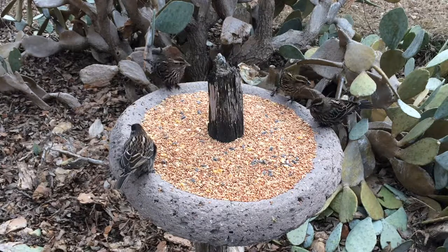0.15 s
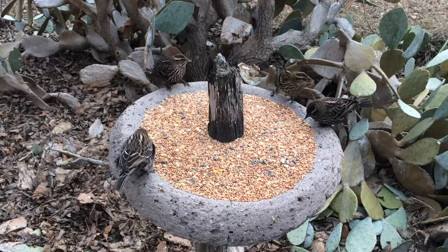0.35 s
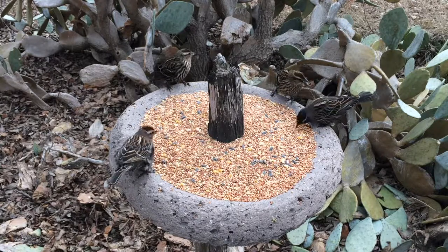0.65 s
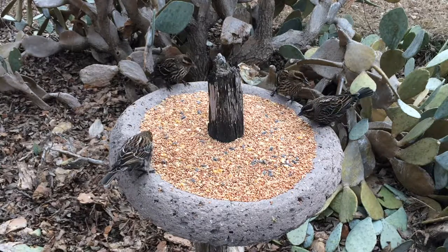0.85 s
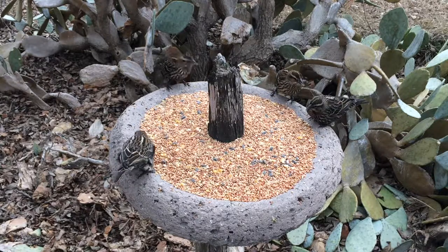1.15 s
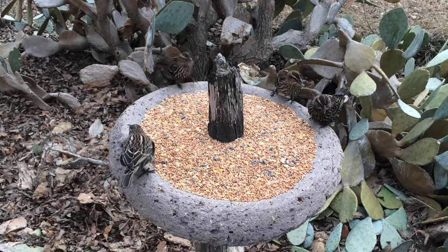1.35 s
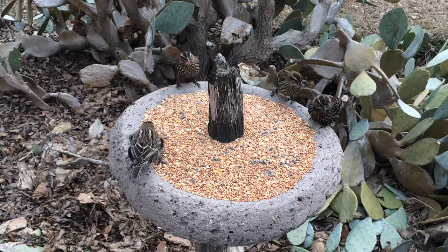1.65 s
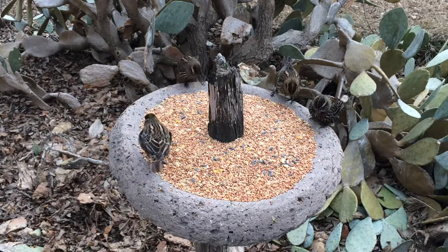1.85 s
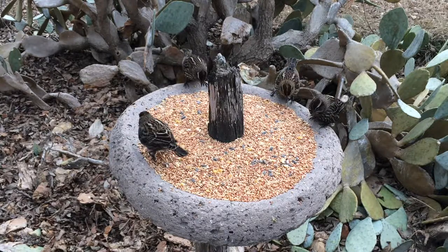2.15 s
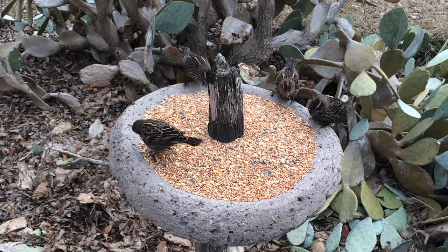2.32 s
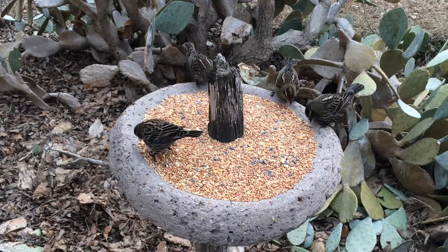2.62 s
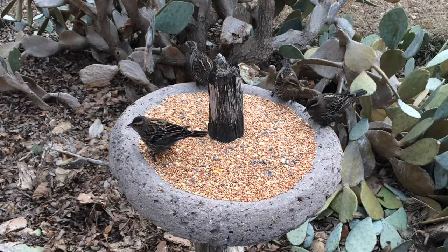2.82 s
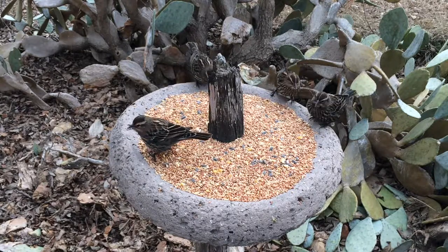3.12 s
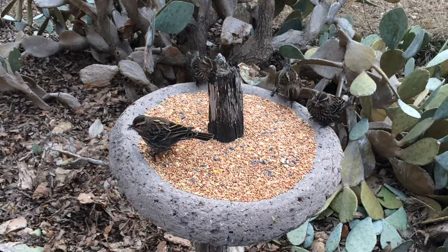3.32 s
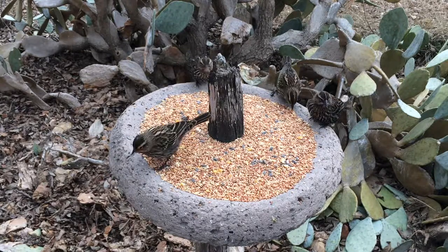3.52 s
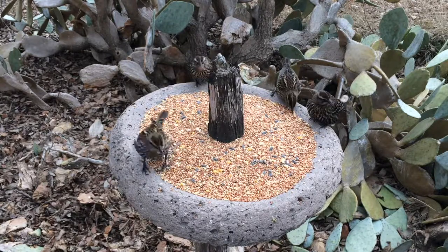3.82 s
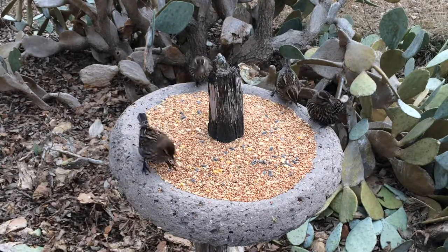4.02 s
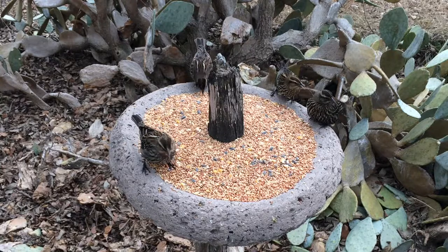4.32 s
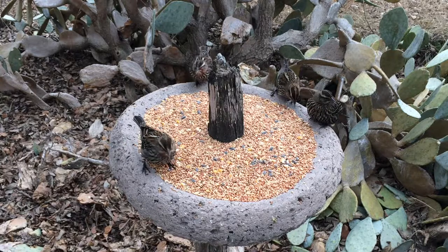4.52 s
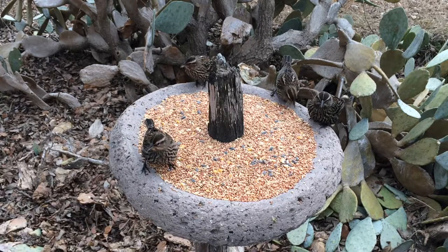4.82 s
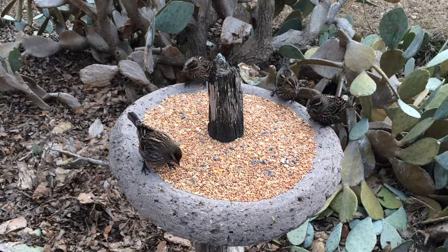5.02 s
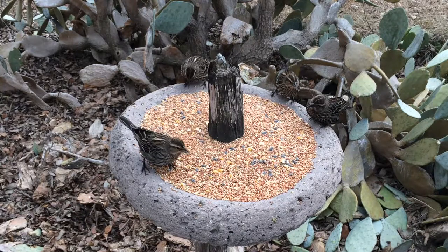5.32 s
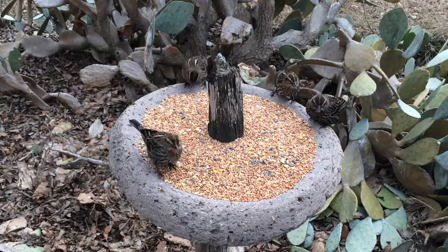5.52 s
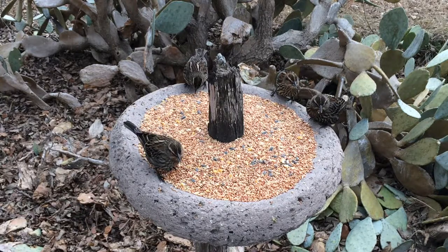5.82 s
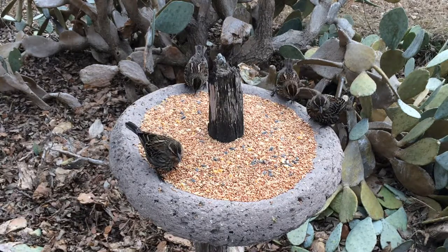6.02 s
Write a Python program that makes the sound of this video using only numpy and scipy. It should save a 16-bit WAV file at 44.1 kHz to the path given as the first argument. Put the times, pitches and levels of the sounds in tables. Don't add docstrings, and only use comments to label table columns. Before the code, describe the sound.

A quiet outdoor garden with faint far traffic hum and hiss. From 0 to 1.3 s, soft low wind puffs bump the microphone while a small cluster of dry beak ticks sounds near 0.45 s and fainter ones near 0.7. Around 1.5-1.9 s come firmer clicks, a tiny hoarse chuck, a faint distant rising bird note and a short chirp. A very hard bright crack lands at 2.5 s. Light taps follow near 3.1, then a crisp husk crunch at 3.3 and scattered ticks of tumbling seed. From 4.17 to 4.7 s blows crowd into a rapid crackling flurry, with a clear rising chirp at 4.4 and a loud snap at 4.5. Wind thumps return at 4.6-5.3, with a rough chuck at 4.9. Sparse ticks, soft chirps near 5.7 and faint far notes close it, seed rustling finely underneath.

```python
import sys
import numpy as np
from scipy import signal
from scipy.fft import rfft, irfft
from scipy.io import wavfile
from scipy.ndimage import uniform_filter1d

SR = 44100
rng = np.random.default_rng(int(sys.argv[2]) if len(sys.argv) > 2 else 0)


def put_to_file(sound):
    columns = np.atleast_2d(sound).T
    safe = np.clip(columns, -1, 1)
    whole_steps = np.round(safe * 32767)
    wavfile.write(sys.argv[1], SR, whole_steps.astype(np.int16))


def ratio(d):
    e = np.asarray(d, float) / 20
    return 10 ** e


N = 271297

# (frequency [Hz], density [dB per Hz])
GARDEN_SPECTRUM = [(15, -7), (25, -5.5), (64, -6), (133, -1.5), (260, -7.5), (1060, -15), (3850, -31),
                   (14400, -42), (15600, -37)]
# (time [s], level [dB])
BREEZE_CURVE = [(0.0, -53), (0.67, -45), (1.16, -51), (1.37, -56), (1.49, -62.5), (1.87, -54.5), (2.3, -63),
                (2.69, -54), (3.99, -60), (4.15, -62), (4.5, -53), (4.88, -51.5), (5.89, -59),
                (6.15, -56.5)]
# (frequency [Hz], density [dB per Hz])
BREEZE_SPECTRUM = [(13, -54), (22, -18), (54, 4), (108, -2), (195, -12.5), (260, -32.5), (351, -28.5),
                   (445, -33.5), (500, -47.5), (650, -41), (1100, -120)]
# (time [s], peak level [dB], swing rate [Hz])
EDDIES = [(0.01, -30, 82), (0.147, -45, 76), (0.46, -26, 94), (0.529, -30.5, 105), (0.666, -28.5, 80),
          (0.788, -26, 67.7), (0.974, -21.5, 90.6), (1.072, -31, 90), (1.264, -30, 105), (1.534, -50, 82.4),
          (1.74, -59, 82), (1.979, -52, 78.1), (2.44, -45.5, 70), (2.636, -46, 62.3), (3.202, -44, 126),
          (3.399, -52, 70.0), (3.527, -48, 123), (3.68, -46.5, 61.6), (4.11, -54, 71), (4.282, -61, 94.2),
          (4.461, -49, 62.6), (4.614, -41, 96), (4.677, -30, 48.4), (4.765, -25.5, 110.3),
          (4.904, -39, 143), (5.023, -36.5, 87), (5.091, -35.5, 70), (5.151, -38, 98), (5.32, -42.5, 106),
          (5.883, -56, 95)]
# (time [s], level [dB])
RUSTLE_CURVE = [(0.0, -74), (0.36, -77), (0.65, -73), (1.18, -76.5), (1.39, -72.5), (1.63, -71), (1.9, -72),
                (2.86, -74.5), (3.63, -71), (3.99, -70.5), (4.38, -67.5), (4.52, -71), (4.81, -74),
                (5.1, -68), (5.26, -68), (5.6, -68), (5.96, -73), (6.15, -68.5)]
# (time [s], length [s], start pitch [Hz], end pitch [Hz], level [dB])
FAR_BIRD_NOTES = [
    (1.524, 0.035, 6500, 8300, -63.5),
    (1.530, 0.038, 6300, 7350, -72),
    (5.893, 0.064, 6550, 6900, -69),
    (5.983, 0.041, 4900, 5600, -74),
    (6.07, 0.078, 4000, 4280, -76),
]
# (time [s], length [s], start pitch [Hz], end pitch [Hz], level [dB])
CHIRP_NOTES = [
    (1.928, 0.024, 5900, 7700, -49),
    (4.391, 0.017, 5520, 7680, -40.5),
    (4.773, 0.029, 5400, 7390, -53.5),
    (5.699, 0.032, 6000, 7680, -53.5),
    (5.798, 0.054, 6500, 7530, -63),
]
# (time [s], length [s], start pitch [Hz], end pitch [Hz], level [dB])
CHUCK_NOTES = [(1.489, 0.013, 1300, 2800, -53.5), (1.487, 0.009, 2400, 3900, -64.5),
               (2.680, 0.012, 2860, 4940, -67.5), (2.688, 0.013, 2550, 2870, -61.5),
               (4.937, 0.018, 1950, 3150, -46.5), (4.944, 0.011, 3470, 2110, -58),
               (4.952, 0.014, 2500, 2730, -54), (4.953, 0.0094, 3200, 3340, -58),
               (5.558, 0.02, 1850, 3700, -58), (5.574, 0.0069, 1960, 2900, -51),
               (5.581, 0.0086, 2950, 2060, -57)]
# (time [s], level [dB], t60 [s], colour [Hz])
CRUMBLES = [(0.4503, -61, 0.019, 9700), (0.693, -55.5, 0.036, 12000), (1.538, -59, 0.033, 3000),
            (3.2597, -32, 0.011, 8200), (3.2661, -47, 0.023, 7900), (3.475, -65, 0.046, 13500),
            (3.529, -63.5, 0.16, 9000), (4.1677, -45.5, 0.038, 5000), (4.176, -41, 0.03, 9700),
            (4.698, -36, 0.035, 9000), (4.8, -69, 0.088, 7400), (5.718, -56.5, 0.16, 6000)]
# (time [s], level [dB], colour [Hz])
SEED_TICKS = [(0.4283, -49, 14560), (0.4327, -50, 12360), (0.4537, -47, 12580), (0.7914, -47, 11630),
              (0.8043, -51, 14250), (1.387, -52, 12960), (2.0289, -53, 9300), (2.0841, -53, 11070),
              (2.118, -49, 14690), (2.125, -53, 8830), (2.1873, -51, 14770), (2.35, -45, 15370),
              (3.2965, -53, 7920), (3.325, -50, 7150), (3.33, -49.5, 8830), (3.4801, -52, 13090),
              (3.538, -49, 7580), (3.5424, -50, 14380), (3.721, -48, 11840), (3.98, -50, 12320),
              (4.0266, -50, 14900), (4.2579, -44, 9860), (4.5923, -50, 15250), (4.8369, -49, 14560),
              (5.21, -51, 11800), (5.2874, -48.5, 14380), (5.3696, -50, 14510), (5.445, -47, 14860),
              (5.5255, -47, 14640), (6.108, -56, 13000)]
# (time [s], contact level [dB], body pitch [Hz], body boost [dB], husk boost [dB])
LARGE_HUSK_BLOWS = [(0.4387, -35.5, 2610, 12, 4), (1.7401, -44, 3110, 21, 21.5),
                    (3.2663, -34, 1870, 16.5, 28), (3.3651, -48.5, 2940, 15, 19),
                    (4.2017, -29.5, 2300, 18, 11), (4.2612, -35.5, 1460, 19.5, 23),
                    (4.2747, -41, 2530, 18, 16), (4.2867, -24.5, 2450, 11.5, 5), (4.3093, -39, 2280, 12, 3),
                    (4.3305, -46, 2740, 16, 9), (4.3717, -45.5, 2720, 22, 28), (4.431, -51, 2310, 25, 13),
                    (4.5281, -13.5, 3400, 10, 3.5), (4.6981, -23, 1630, 10.5, 15),
                    (4.8691, -32.5, 2680, 12, 3), (5.2014, -49.5, 1550, 29.5, 8)]
MEDIUM_HUSK_BLOWS = [(1.665, -32.5, 3800, 24.3, 12), (1.7555, -30, 2800, 16.8, 9.8),
                     (2.3658, -41, 2460, 16, 14.6), (2.8152, -38.5, 1630, 10, 3.5),
                     (3.26, -37.5, 5600, 33.3, 22), (4.1693, -29, 3800, 17.4, 16),
                     (4.244, -51, 2870, 23, 22), (4.265, -36.5, 2000, 20, 21), (4.2913, -25, 1400, 4, 14.5),
                     (4.3004, -44, 2030, 9, 9), (4.45, -25.5, 3180, 16.5, 16.7),
                     (4.4831, -56, 4160, 31, 15), (4.7023, -36, 2740, 19, 12), (4.7065, -39, 2580, 3, 15)]
SMALL_HUSK_BLOWS = [
    (0.4503, -32, 1400, -2, 2),
    (0.654, -52.5, 4450, 24.5, 14),
    (1.563, -26, 2650, 14, 6.7),
    (1.9028, -27, 1810, 25.5, 13.7),
    (2.4752, -12, 4340, 2.5, 14.1),
    (3.1075, -44.5, 6000, 16.5, 16),
    (3.7025, -37.5, 4460, -4, 7.8),
    (4.1767, -21, 6440, 12.5, 17.2),
    (5.639, -42, 5460, 12, 12),
    (5.6929, -39.5, 2360, 25.5, 26),
]
TINY_HUSK_BLOWS = [(0.4252, -44, 3700, 25.5, 24), (0.694, -38, 2860, 10, 21), (0.701, -43.5, 2930, 14, 21),
                   (1.3033, -35, 4050, 19.5, 8.8), (1.6687, -41, 3670, 16, 9), (3.0855, -44, 3210, 17, 8),
                   (3.1345, -28.5, 2870, 13, 9), (3.587, -52, 2690, 25.5, 22),
                   (3.768, -27.5, 2870, 5.5, 11.5), (3.9517, -41, 2830, 12.5, 22.3),
                   (4.3197, -23, 3500, 11.5, 7), (4.381, -48, 5540, 22, 22), (4.8883, -44, 2450, 32, 23),
                   (5.3257, -33, 1780, 10, 11), (5.3301, -41, 2410, 14.5, 15), (5.687, -44, 3470, -5, 17),
                   (5.933, -32.5, 3320, 30.5, 21.7)]
HUSK_RING_HZ = [7100, 9000, 12300, 14400]


def rms_one(x):
    return x / np.sqrt(np.mean(x ** 2) + 1e-20)


def level(rows):
    s, db = np.transpose(rows)
    return ratio(np.interp(np.arange(N) / SR, s, db))


def add(out, s, sound):
    i = max(round(s * SR), 0)
    out[i:i + len(sound)] += sound[:N - i]


def coloured(points):
    hz, db = np.transpose(points)
    bins_hz = np.maximum(np.arange(N // 2 + 1) * SR / N, 1)
    gain = ratio(np.interp(np.log(bins_hz), np.log(hz), db))
    return rms_one(irfft(rfft(rng.standard_normal(N)) * gain, N))


def drift(rate_hz):
    r = np.exp(-2 * np.pi * rate_hz / SR)
    wander = signal.lfilter([1], [1, -2 * r, r * r], rng.standard_normal(N + SR))
    return rms_one(wander[SR:])


def resonance(x, hz, width_hz):
    r = np.exp(-np.pi * width_hz / SR)
    poles = [1, -2 * r * np.cos(2 * np.pi * hz / SR), r * r]
    return signal.lfilter([(1 - r * r) / 2, 0, (r * r - 1) / 2], poles, x)


def boost(x, hz, width_hz, db):
    return x + (ratio(db) - 1) * resonance(x, hz, width_hz)


def high_pass(x, hz):
    return signal.sosfilt(signal.butter(3, hz, "high", fs=SR, output="sos"), x)


def scatter(x, gap_s, t60_s, echo_db, thin):
    t = np.arange(round(t60_s * SR)) / SR
    tail = rng.standard_normal(len(t)) * ratio(-60 * t / t60_s) * np.clip(t / 0.00063, 0, 1)
    tail = ratio(echo_db) * tail / np.sqrt(np.sum(tail ** 2))
    tail = np.r_[np.zeros(round(gap_s * SR)), tail]
    tail = signal.sosfilt(signal.butter(4, 13500, fs=SR, output="sos"), tail)
    tail = signal.lfilter([1, -thin], [1], tail)
    return x + signal.fftconvolve(x, tail)[:N]


def snap(noise, decay_s, rise_s):
    t = np.arange(len(noise)) / SR
    burst = noise * (1 - np.exp(-t / rise_s)) * np.exp(-t / decay_s)
    return burst / np.sqrt(np.sum(burst ** 2))


def garden():
    return ratio(-57) * coloured(GARDEN_SPECTRUM[:-1])


def wind():
    wake_db, wake_rise_s, wake_fall_s, wake_lead_s = -9, 0.039, 0.0154, 0.018
    strength, eddies = level(BREEZE_CURVE) * ratio(-0.5), np.zeros(N)
    after_s = np.arange(SR // 2) / SR
    wake = (1 - np.exp(-(after_s / wake_rise_s) ** 2)) * np.exp(-after_s / wake_fall_s)
    wake = wake / wake.max()
    for (s, db, hz), turn in zip(EDDIES, rng.random(len(EDDIES))):
        t = np.arange(round(3.0 * SR / hz)) / SR
        swing = np.sin(2 * np.pi * (hz * t + turn))
        add(eddies, s, ratio(db - 5.5) * np.hanning(len(t)) ** 1.26 * swing)
        add(strength, s - wake_lead_s, ratio(db + wake_db) * wake)
    lumps = ratio(-1.0 + 1.9 * drift(19.0))
    return eddies + strength * lumps * coloured(BREEZE_SPECTRUM)


def rustle():
    sizes = ratio(np.minimum(rng.exponential(1, N), 5)) * rng.choice([-1, 1], N)
    grains_per_s = 4000 * ratio(4.5 * drift(35))
    born = rng.random(N) < grains_per_s / SR
    grains = resonance(sizes * born, 15000, width_hz=22000)
    return level(RUSTLE_CURVE) * rms_one(high_pass(grains, 3500))


def calls(rows, bend, octave_db, waver, flutter_db):
    strain, loud_call_db = 0.5, -40
    out, wobble, flutter, breath = np.zeros(N), drift(300), drift(210), drift(600)
    for s, length_s, start_hz, end_hz, db in rows:
        t = np.arange(round(length_s * SR)) / SR
        start = round(s * SR)
        now = slice(start, start + len(t))
        glide = (1 - np.exp(-t / length_s / bend)) / (1 - np.exp(-1 / bend))
        hz = start_hz + (end_hz - start_hz) * glide
        phase = 2 * np.pi * np.cumsum(hz * (1 + waver * wobble[now])) / SR
        swell = np.sin(np.pi * (t / length_s) ** 0.72) ** 0.73 * ratio(db + flutter_db * flutter[now])
        octave = ratio(octave_db + strain * (db - loud_call_db)) * (1.5 + 1.8 * breath[now])
        add(out, s, swell * (np.sin(phase) + octave * np.sin(2 * phase)))
    return out


def far_bird():
    notes = calls(FAR_BIRD_NOTES, bend=0.7, octave_db=-26, waver=0.018, flutter_db=4.5)
    return scatter(notes, gap_s=0.0017, t60_s=0.37, echo_db=0.5, thin=0.11)


def chucks():
    notes = calls(CHUCK_NOTES, bend=0.68, octave_db=-23, waver=0.086, flutter_db=3.0)
    return scatter(notes, gap_s=0.0045, t60_s=0.086, echo_db=-2, thin=0.1)


def chirps():
    notes = calls(CHIRP_NOTES, bend=0.314, octave_db=-15, waver=0.01, flutter_db=2.5)
    return scatter(notes, gap_s=0.005, t60_s=0.32, echo_db=-9.5, thin=0.11)


def crunches():
    out, t = np.zeros(N), np.arange(3000) / SR
    for s, db, t60_s, hz in CRUMBLES:
        noise, lumps = rng.standard_normal((2, 3000))
        grains = noise * ratio(2.2 * rms_one(uniform_filter1d(lumps, size=30)))
        add(out, s, ratio(db - 60 * t / t60_s) * rms_one(resonance(grains, hz, width_hz=1.4 * hz)))
    return high_pass(out, 1170)


def stray_ticks(count):
    low_hz, high_hz = 7000, 14700
    when, size, colour = rng.random((count, 3)).T
    db = -61 + 3.0 * (2 * size - 1)
    return list(zip(when * N / SR, db, low_hz + (high_hz - low_hz) * colour))


def ticks():
    out = np.zeros(N)
    for s, db, hz in SEED_TICKS + stray_ticks(count=40):
        crack = snap(rng.standard_normal(400), decay_s=0.001, rise_s=0.0002)
        tick = 0.75 * crack + 1.15 * resonance(crack, hz, width_hz=2000)
        add(out, s - 0.0004, ratio(db + 10.5) * tick)
    return high_pass(out, 2500)


def pecks():
    out = np.zeros(N)
    tables = (LARGE_HUSK_BLOWS, MEDIUM_HUSK_BLOWS, SMALL_HUSK_BLOWS, TINY_HUSK_BLOWS)
    for rows, husk_hz in zip(tables, HUSK_RING_HZ):
        for s, db, body_hz, body_db, husk_db in rows:
            crack = 0.45 * snap(rng.standard_normal(400), decay_s=0.00035, rise_s=0.0001)
            crack[0] += 0.85
            shell = high_pass(boost(crack, husk_hz, 2830, husk_db), 3500)
            body = resonance(crack, body_hz, 0.62 * body_hz)
            body = resonance(body, body_hz, 0.62 * body_hz)
            add(out, s, ratio(db - 1.5) * (shell - ratio(body_db) * body))
            echo_s = rng.uniform(0.0002, 0.0005)
            add(out, s + echo_s, ratio(db) * 0.4 * high_pass(shell, 6900))
    return signal.sosfilt(signal.butter(2, 15000, fs=SR, output="sos"), out)


def scene():
    hiss_top = signal.ellip(10, 0.5, 50, 15900, fs=SR, output="sos")
    steady = signal.sosfilt(hiss_top, garden() + rustle())
    birds = far_bird() + chucks() + chirps()
    bowl = scatter(pecks() + ticks() + crunches(), gap_s=0.006, t60_s=0.06, echo_db=-18.5, thin=0.2)
    return (steady + wind() + birds + bowl)[None]


def roll_off(x):
    return signal.sosfilt(signal.butter(12, 16820, fs=SR, output="sos"), x)


def record(dry):
    thin = signal.sosfilt(signal.butter(2, 42, "high", fs=SR, output="sos"), dry)
    mix = signal.sosfilt(signal.ellip(10, 0.5, 80, 16550, fs=SR, output="sos"), thin)
    return roll_off(mix)


dry = scene()
out = record(dry)
put_to_file(out)
```